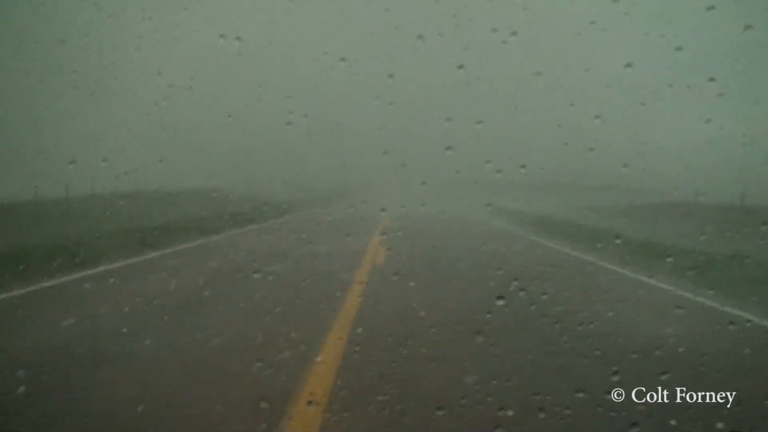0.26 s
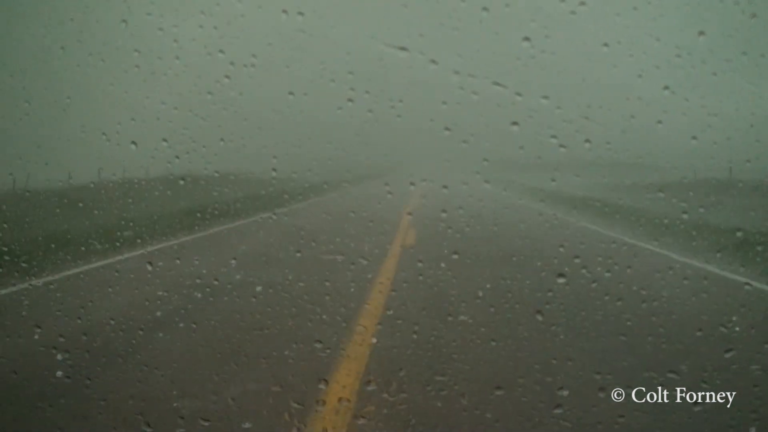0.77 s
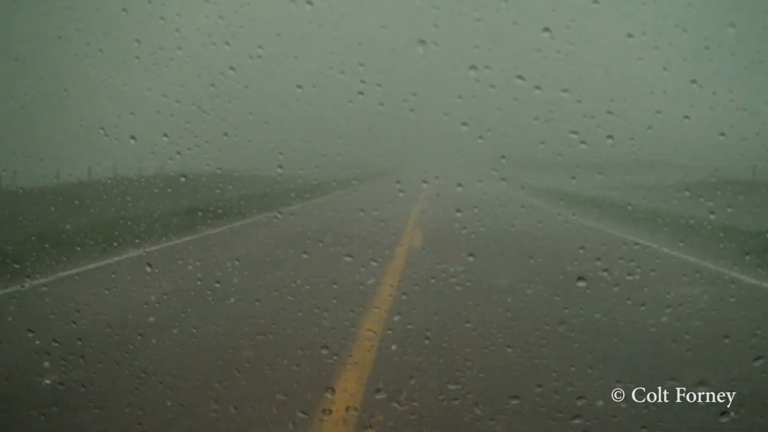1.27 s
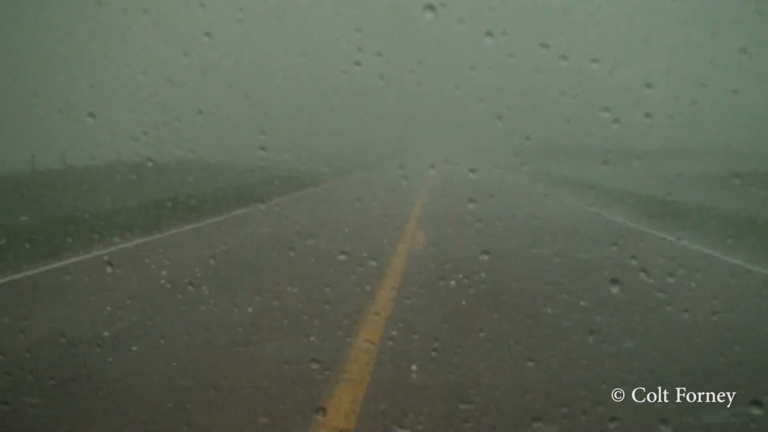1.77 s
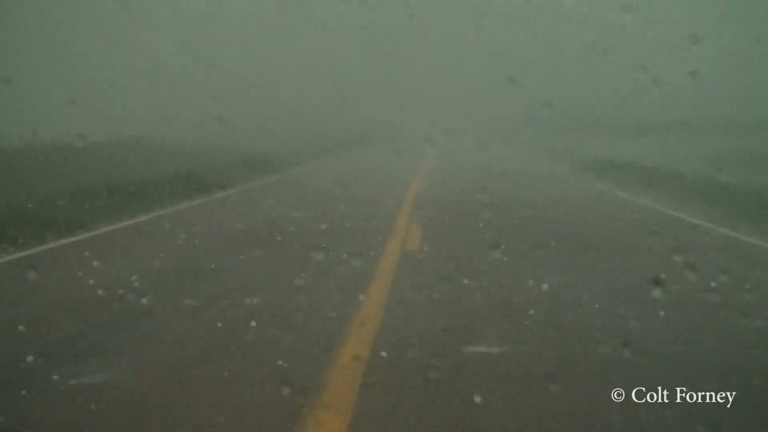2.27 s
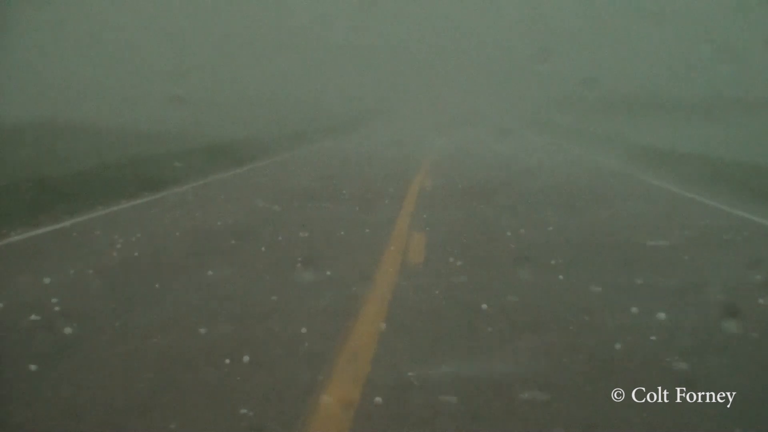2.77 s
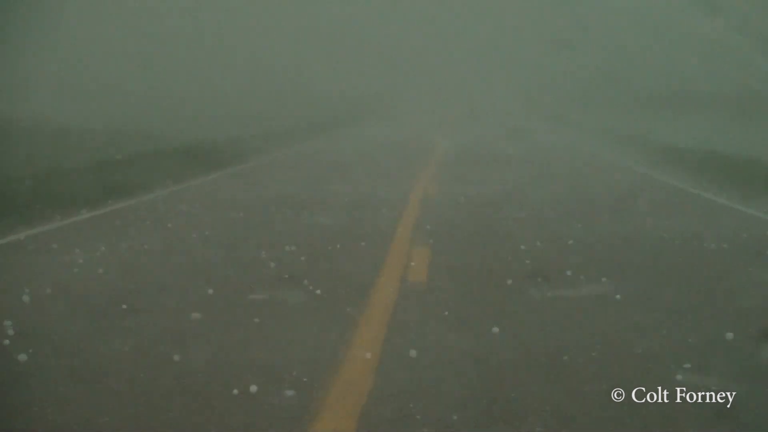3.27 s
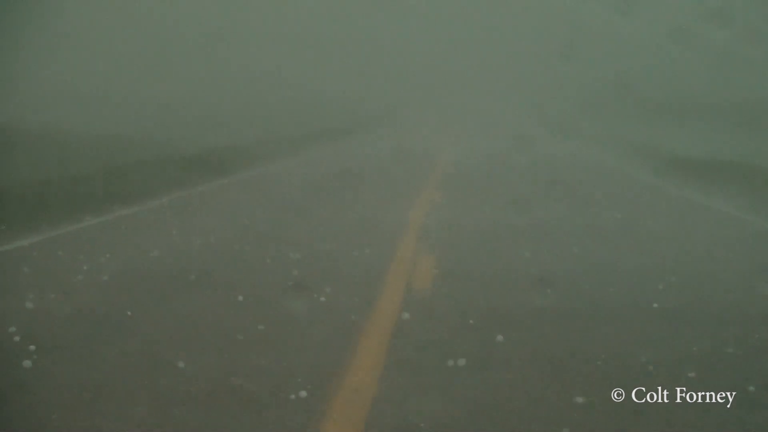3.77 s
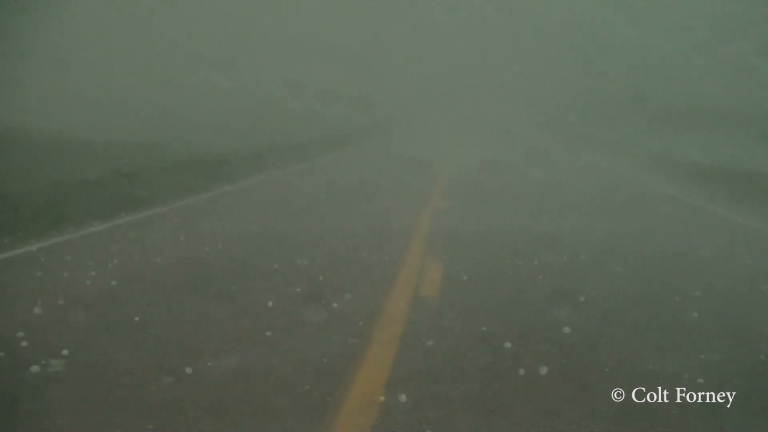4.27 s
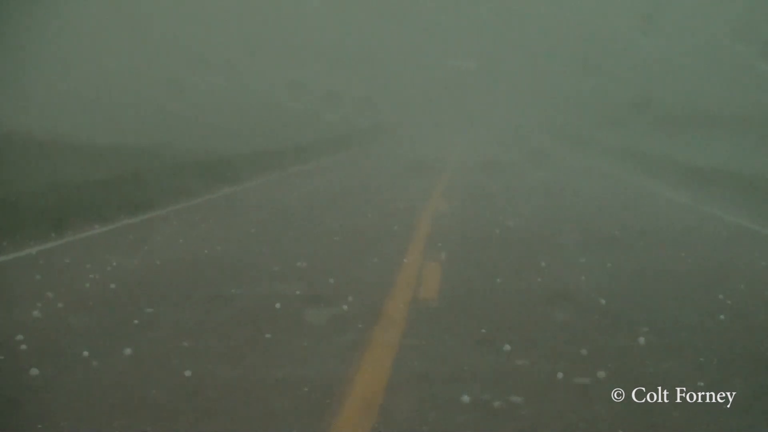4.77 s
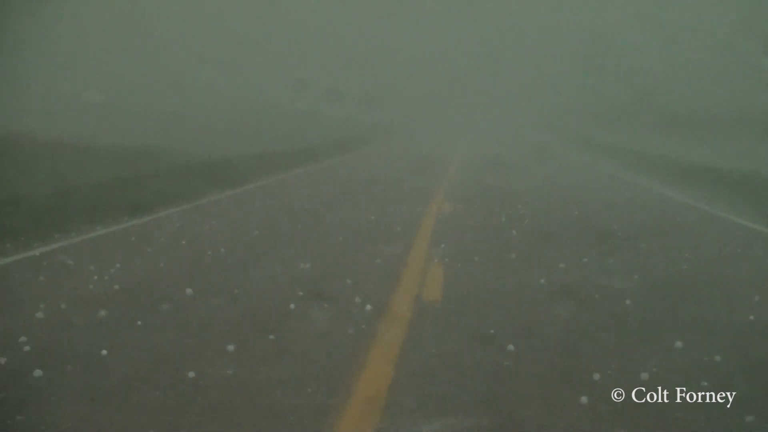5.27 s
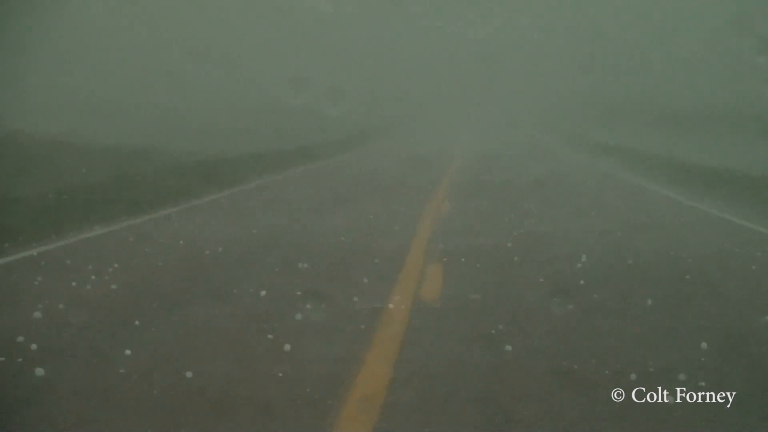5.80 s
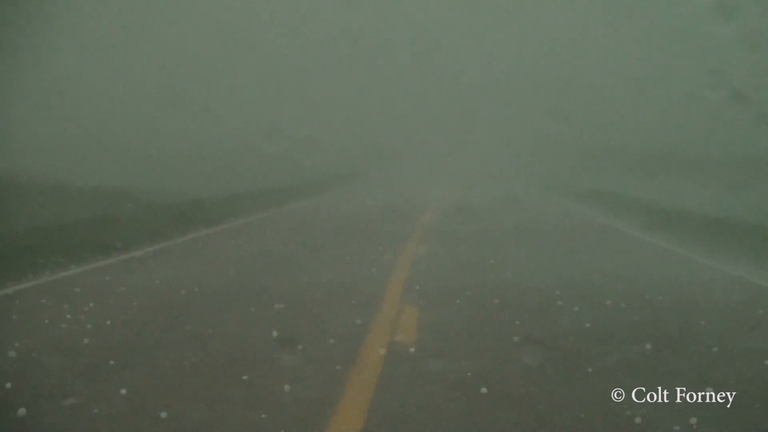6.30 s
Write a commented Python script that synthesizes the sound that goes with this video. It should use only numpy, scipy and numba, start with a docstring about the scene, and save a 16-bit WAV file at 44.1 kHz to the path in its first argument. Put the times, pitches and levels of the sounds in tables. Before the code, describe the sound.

Hailstones clatter irregularly on a car's roof, bonnet and glass, hard knocks and bright icy cracks heard inside the cabin over faint rain.

```python
"""Hailstones strike the roof, bonnet and glass of a car, heard inside the cabin over rain and small pellets.
Each stone rings a dense, new set of damped panel modes; treble dies first, the boom and shell hum last.
Ice shards and skipping fragments add short bright modes; heavy blows flex the roof with a low thump.
Rain is filtered noise. Gain control flattens the loud blows and ducks the patter."""
import sys
import numpy as np
from scipy import signal
from scipy.fft import rfft, irfft, next_fast_len
from scipy.io import wavfile
from scipy.ndimage import uniform_filter1d
from numba import njit

SR = 44100
rng = np.random.default_rng(int(sys.argv[2]) if len(sys.argv) > 2 else 0)


def pcm_store(signal):
    """Save signal as 16-bit PCM."""
    levels = np.round(np.clip(np.atleast_2d(signal), -1, 1) * 32767)
    wavfile.write(sys.argv[1], SR, levels.astype(np.int16).T)


N = 288499
TOP_HZ = 16600  # limit of the panel modes and of the output band

# hailstones: (time [s], strength [dB], panel note [Hz], boom re strength [dB], crack re strength [dB],
# left-right difference [dB], ring length [1 = usual])
HAILSTONES = [(0.136, -16, 1126, -15.5, -8, -2.5, 1.04), (0.282, -7, 950, -38, -25, -1, 0.7),
              (0.458, -9.5, 560, -26.5, -9, 0, 0.87), (0.4622, -19, 4900, -13, 2.5, -2, 0.52),
              (0.519, -7.5, 302, -18.5, -11.5, 5.5, 0.74), (0.592, -34.5, 318, -10, -14, 2.5, 1.3),
              (0.648, -26.5, 350, -28, -21, 4, 1.8), (0.718, -32, 288, -12.5, -7.5, 2, 0.75),
              (0.751, -12, 656, -14.5, -2.5, -5.5, 0.9), (0.826, -12, 575, -12, -13, -4.5, 1.09),
              (1.017, -22.5, 920, -26, 1.5, 3, 0.84), (1.109, -12.5, 177, -16.5, -15, 1.5, 0.63),
              (1.212, -22, 260, -16.5, -15, -1.5, 1.23), (1.286, -28.5, 620, -17, 6.5, 4, 0.47),
              (1.428, -18, 218, -14, -3.5, 4.5, 0.83), (1.668, -8, 306, -22, -8.5, 2.5, 0.75),
              (1.829, -33, 416, -21, -12.5, 0, 1.4), (2.038, -10.5, 306, -22.5, -13, 3.5, 1.34),
              (2.081, -10, 195, -17.5, -6.5, 3.5, 0.89), (2.122, -21, 139, -19, -17.5, -5.5, 1.1),
              (2.19, -17.5, 504, -13, -4.5, 4, 0.69), (2.266, -11.5, 557, -17.5, -18.5, -1.5, 0.94),
              (2.464, -13, 171, -11, -8, -2, 1.11), (2.831, -9.5, 270, -9.5, -16, 0, 0.8),
              (2.848, -9, 283, -17, -10.5, 3, 0.85), (2.901, -14.5, 179, -23, -2.5, 5, 0.67),
              (2.933, -18.5, 520, -17.5, -4.5, 3.5, 0.72), (3.221, -36.5, 570, -27, -5, 1, 1.15),
              (3.509, -19, 600, -19, -4, 2, 0.78), (3.542, -24.5, 3700, -30, 4.5, 0.5, 0.68),
              (3.574, -17.5, 317, -16.5, -10.5, 0.5, 0.57), (3.621, -22.5, 540, -12, -12.5, 0.5, 1.12),
              (3.692, -14, 304, -11.5, -7, 0.5, 1.15), (3.883, -34, 706, -7.5, -16.5, 2.5, 0.81),
              (3.93, -24, 1110, -17.5, -1, -0.5, 0.62), (4.051, -16, 1070, -14.5, 1, -2, 0.83),
              (4.075, -12, 550, -20, -7, 2, 0.82), (4.246, -39.5, 85, -12, -10, 3, 3.7),
              (4.277, -11, 256, -22.5, -2, 3.5, 1.01), (4.3, -14.5, 320, -12, -11.5, -1.5, 0.56),
              (4.474, -46, 1720, -6.5, -18, 4, 1.7), (4.548, -36, 2960, -31, -6, 5, 0.52),
              (4.791, -16, 870, -14, -3, -3.5, 0.61), (4.807, -15, 443, -22.5, -14, 2.5, 1.16),
              (5.057, -29, 286, -7.5, -17.5, 0.5, 1.16), (5.343, -40, 398, -12, -5.5, -2, 1.3),
              (5.349, -25.5, 490, -9, -17, -2.5, 1.13), (5.487, -20, 333, -10.5, -15, 2.0, 0.75),
              (5.655, -18.5, 287, -16.5, -6.5, -0.5, 1.07), (5.759, -19.5, 520, -17.5, -9, -2.5, 1.04),
              (5.822, -22.5, 397, -20, -1.5, 3, 0.74), (5.966, -13, 487, -24.5, -11, -1.5, 0.97),
              (6.007, -31, 315, -33, 10, 3, 0.78), (6.114, -14, 510, -12.5, -11, -2.5, 1.17),
              (6.28, -45, 615, -8.5, -19, -7, 1.55), (6.332, -38, 3400, -29, -4, 5, 0.78),
              (6.417, -36, 312, -20, -15, 3, 0.46), (6.438, -19, 456, -12, -7.5, 1.5, 0.81),
              (6.517, -18.5, 1210, -19, -1.5, 4, 1.06)]
# likeness of left and right: (frequency [Hz], likeness [0-1])
LIKENESS = [(60, .97), (200, .72), (550, .6), (9500, .68), (12000, .99)]


def amp(db):
    """Amplitude ratio of a level in dB."""
    return 10 ** (np.asarray(db) / 20)


def along(points, hz):
    """(Hz, value) points interpolated on a log frequency axis."""
    f, v = np.transpose(points)
    return np.interp(np.log(hz + 1), np.log(f + 1), v)


def filtered(x, response):
    """Multiplies the spectrum of x by a response of frequency, padded against wrap-around."""
    m = next_fast_len(N + 8192)
    return irfft(rfft(x, m) * response(np.fft.rfftfreq(m, 1 / SR)), m)[..., :N]


def spread_rad(hz):
    """Mid-side mixing angle that gives the left-right likeness at each frequency."""
    return np.arccos(np.clip(along(LIKENESS, hz), -1, 1)) / 2


def to_samples(s):
    """Times in seconds as the nearest sample indices."""
    return np.round(s * SR).astype(np.int64)


def mode_step(hz, t60_s):
    """Complex step of one sample: rotation at hz, decay by 60 dB in t60_s."""
    return np.exp((2j * np.pi * hz - np.log(1000) / t60_s) / SR)


@njit
def add(out, start, length, turn, rise, left, right):
    """Adds damped modes; turn is the complex step of one sample, rise the fade-in step."""
    for k in range(len(start)):
        z, gap = 1 + 0j, 1.0
        for i in range(start[k], min(start[k] + length[k], out.shape[1])):
            z *= turn[k]
            gap *= rise[k]
            out[0, i] += (1 - gap) * (z * left[k]).real
            out[1, i] += (1 - gap) * (z * right[k]).real


def panels(blows, rise_s, note_db, count):
    """Rings count damped panel modes per blow, at new pitches and strengths: every stone lands elsewhere."""
    # centres of boom, knock, clank, crack, snap: (frequency [Hz])
    part_centres_hz = [110, 370, 1250, 3600, 8500]
    # panel damping at ring length 1: (frequency [Hz], t60 [s])
    damping = [(50, 0.23), (150, 0.24), (400, 0.14), (1100, 0.11), (3000, 0.089), (9000, 0.058)]
    # colour of the cabin: (frequency [Hz], gain [dB])
    cabin_colour = [(70, -14.5), (120, -2), (490, 4), (3300, 0), (3770, 0), (4200, -1.5), (7500, -1),
                    (12500, -11.5), (16000, -24)]

    blows = np.asarray(blows, float)
    s, note_hz, parts_db, pan_db, ring_length = np.split(blows, [1, 2, 7, 8], axis=1)
    jitter = rng.random((len(blows), count))
    a, b, c, d = np.moveaxis(rng.standard_normal((len(blows), count, 4)), -1, 0)
    hz = 40 + (TOP_HZ - 40) * ((np.arange(count) + jitter) / count) ** 2

    level_db = np.array([along(np.c_[part_centres_hz, p], f) for p, f in zip(parts_db, hz)])
    level_db += note_db * np.exp(-(np.log(hz / note_hz) / 0.13) ** 2)  # the struck panel favours one note
    modes_sharing = count * np.sqrt(hz / TOP_HZ) / 2  # neighbouring modes share the level of a part
    size = amp(level_db + along(cabin_colour, hz)) / np.sqrt(modes_sharing)
    t60_s = np.clip(ring_length * along(damping, hz), .005, 1)
    rise = np.exp(-1 / ((rise_s + 0.42 / hz) * SR))  # low modes build up slower

    angle = spread_rad(hz)
    mid = np.cos(angle) * (a + 1j * b)
    side = np.sin(angle) * (c + 1j * d)
    left = size * amp(pan_db / 2) * (mid + side)
    right = size * amp(-pan_db / 2) * (mid - side)
    out = np.zeros((2, N))
    add(out, to_samples(s).repeat(count), (t60_s * SR).astype(np.int64).ravel(),
        mode_step(hz, t60_s).ravel(), rise.ravel(), left.ravel(), right.ravel())
    return out


def rain_db(s):
    """Patter and hiss levels at time s."""
    # rain: (time [s], patter on the body [dB], hiss on the glass [dB])
    rain_levels = [(0, -57.5, -68.5), (1, -58.5, -65.5), (2.35, -53.5, -62.5), (2.75, -60.5, -73.5),
                   (3.3, -63.5, -66.5), (3.85, -55.5, -64.5), (4.65, -60.5, -67), (5.2, -63, -75.5),
                   (5.9, -61, -73), (6.54, -58, -64)]
    when, *levels = np.transpose(rain_levels)
    return [np.interp(s, when, db) for db in levels]


def rain():
    """Drops patter on the body and hiss on the glass, over a low road rumble: flickering noise in three bands."""
    # spectral slope of rain and road: (frequency [Hz], relative density [dB per Hz])
    slope = [(50, 14.5), (500, 2.5), (3800, -15.5), (10000, -33.5), (12500, -37), (14500, -50)]
    # edges of rumble, patter, hiss: (frequency [Hz])
    band_edges_hz = [1, 350, 4700, SR]

    z = signal.stft(rng.standard_normal((2, N)), nperseg=256)[2]
    flicker = uniform_filter1d(rng.standard_normal(z.shape[1:]), size=30, axis=0)
    flicker = uniform_filter1d(flicker, size=5, axis=1)
    flicker_db = 2 * flicker / flicker.std()
    noise = signal.istft(z * amp(flicker_db), nperseg=256)[1][:, :N]

    patter_db, hiss_db = rain_db(np.arange(N) / SR)
    out = np.zeros((2, N))
    for low_hz, high_hz, db in zip(band_edges_hz, band_edges_hz[1:], [-58, patter_db, hiss_db]):
        def mid_side_response(hz):
            low_pass = 1 / (1 + (hz / high_hz) ** 4)
            high_pass = 1 / (1 + (low_hz / (hz + 1)) ** 4)
            angle = spread_rad(hz)
            return amp(along(slope, hz)) * low_pass * high_pass * np.array([np.cos(angle), np.sin(angle)])
        mid, side = filtered(noise, mid_side_response)
        out += amp(db) * np.array([mid + side, mid - side]) / np.hypot(mid.std(), side.std())
    return out * amp([[1.2], [-1.2]])  # slightly left


def pellets(count=420):
    """Small stones and big drops: short ticks of panel modes, each on its own glass note; most barely top the rain."""
    # pellets heard singly: (time [s], level [dB], knock re level [dB])
    single_pellets = [(.076, -64.5, 25), (.251, -44, 3), (1.182, -41, 3), (1.965, -37.5, -19),
                      (2.544, -35.5, -18), (2.629, -43.5, 8), (2.71, -50, 4), (3.068, -40.5, 1),
                      (3.345, -47, -8), (3.982, -38, -15), (4.162, -33.5, -11), (4.224, -38, -13),
                      (4.356, -43, 11), (4.508, -40, -8), (5.129, -56, 16), (5.458, -47, -5),
                      (5.558, -45.5, 9), (6.176, -39.5, 8), (6.215, -49, 5), (6.498, -31.5, -5)]

    when, size, tilt, side, note = rng.random((count, 5)).T
    s = when * N / SR
    patter_db, hiss_db = rain_db(s) + 9 * size ** 2
    dull_db = 14 * (tilt - .5)
    low_db = patter_db - 15.5 + dull_db
    many = np.c_[s, 1500 + 4000 * note, low_db, low_db, low_db, patter_db - 5, hiss_db + 4 - dull_db,
                 10 * side - 2, .1 + .7 * size]

    s, db, knock_db = np.transpose(single_pellets)
    side, note = rng.random((len(s), 2)).T
    low_db = db + knock_db - 8
    single = np.c_[s, 3000 + 1400 * note, low_db - 12, low_db, low_db - 1.5, db - 4, db - 3.5,
                   6 * side, np.full(len(s), .75)]
    return panels(np.vstack([many, single]), rise_s=0.00027, note_db=3, count=100)


def stone_rows():
    """Blow rows for panels(): five part levels per stone from its strength, boom and crack."""
    # boom, knock, clank, crack, snap of every stone: (level re strength [dB])
    part_offsets_db = [7.5, -1, -6, 3.5, 6]
    # how far each part follows the boom column: (factor [dB per dB])
    boom_reach = [1, 0.46, -0.06, 0.21, 0.094]
    # how far each part follows the crack column: (factor [dB per dB])
    crack_reach = [0.12, 0, 0.051, 0.9, 1.145]

    s, db, note_hz, boom_db, crack_db, pan_db, ring_length = np.array(HAILSTONES, float).T[..., None]
    parts_db = db + part_offsets_db + boom_db * boom_reach + crack_db * crack_reach
    return np.hstack([s, note_hz, parts_db, pan_db, ring_length])


def stones():
    """Each hailstone excites a dense set of damped modes in the panel it strikes."""
    return panels(stone_rows(), rise_s=0.0031, note_db=7.0, count=330)


def shell_hum():
    """Every stone hums the whole shell on the same low modes, each as its (random) landing spot allows."""
    # shell modes: (nominal frequency [Hz], level re boom [dB], t60 [s])
    shell_modes = [(123.7, -18.5, 0.56), (208.2, -22, 0.52), (286.5, -17.5, 0.34), (474, -4.5, 0.18)]

    rows = stone_rows()
    hz, db, t60_s = np.transpose(shell_modes)
    a, b, c = np.moveaxis(rng.standard_normal((len(rows), len(hz), 3)), -1, 0)
    boom_db = rows[:, [2]]
    size = (amp(boom_db + db) * amp(3 * a) * np.exp(2j * b)).ravel()  # random level and phase
    detuned_hz = hz * (1 + 0.017 * c)
    out = np.zeros((2, N))
    add(out, to_samples(rows[:, 0]).repeat(len(hz)), np.tile(t60_s * SR, len(rows)).astype(np.int64),
        mode_step(detuned_hz, t60_s).ravel(), np.tile(np.exp(-hz / (1.5 * SR)), len(rows)), size, size)
    return out


def shards():
    """Shattering ice: a dry, bright crack follows each blow; the higher its crack, the sooner, louder, shorter."""
    rows = stone_rows()
    late, size = rng.random((len(rows), 2)).T
    crack_db = np.array(HAILSTONES)[:, 4]
    soft = np.clip(0.5 - 0.06 * crack_db, 0, 1)
    rows[:, 0] += 0.0049 * late * soft
    rows[:, 2:7] += np.array([-36, -6.0, -21, 8.0, -4.0]) + (8 * size - 6 * soft)[:, None]
    rows[:, 8] = 0.16 + 0.24 * soft
    return panels(rows, rise_s=0.00066, note_db=10.5, count=100)


def fragments(count=3):
    """Pieces of each stone skip and land again within moments: thin clicks that roughen the blow."""
    skip_s, skip_loss_db = 0.022, 12  # latest landing, and the loss by then
    rows = stone_rows().repeat(count, axis=0)
    late, size = rng.random((len(rows), 2)).T
    rows[:, 0] += skip_s * late
    rows[:, 2:7] += np.array([-40, -11, -1.5, 4.5, 0]) - (skip_loss_db * late + 8 * size)[:, None]
    rows[:, 8] = 0.078
    return panels(rows, rise_s=0.00019, note_db=7, count=60)


def thumps():
    """Under heavy blows the roof gives way and swings back a few times: one damped low mode, slow to start."""
    # roof thumps: (time [s], pitch [Hz], level before the common offset [dB])
    roof_thumps = [(0.523, 66.4, -31), (1.428, 62, -50), (1.669, 59.5, -38), (2.04, 54, -37),
                   (2.085, 73.6, -38), (2.464, 80, -34), (3.508, 66.4, -47.5), (3.691, 118, -46),
                   (4.27, 66.6, -42), (5.351, 165, -37.5), (5.759, 60, -49), (6.42, 70.4, -55)]
    rise_s, t60_s, offset_db = 0.014, .16, 20

    s, hz, db = np.transpose(roof_thumps)
    size = -1j * amp(db + offset_db)  # starts at zero displacement
    out = np.zeros((2, N))
    add(out, to_samples(s), np.full(len(s), int(t60_s * SR)), mode_step(hz, t60_s),
        np.full(len(s), np.exp(-1 / (rise_s * SR))), size, size)
    return out


def scene():
    """Rain, pellets, stones, shell hum, shards, fragments and roof thumps sum at both microphone ports."""
    return rain() + pellets() + stones() + shell_hum() + shards() + fragments() + thumps()


@njit
def follow(level, attack, release):
    """A peak detector that charges fast and drains slowly."""
    out, held = np.empty_like(level), 0.0
    for i in range(len(level)):
        held += (attack if level[i] > held else release) * (level[i] - held)
        out[i] = held
    return out


def record(dry):
    """Gain control turns down what passes the knee, the input stage rounds peaks off, a band limit cuts the top."""
    attack_s, release_s, knee_db, clip = .0005, 0.031, -17, .42
    held = follow(np.abs(dry).max(axis=0), 1 / (attack_s * SR), 1 / (release_s * SR))
    gain = (1 + (held / amp(knee_db)) ** 2) ** -.3
    levelled = dry * gain
    rounded = levelled / (1 + (levelled / clip) ** 4) ** (1 / 4)
    return filtered(rounded, lambda hz: hz < TOP_HZ)


dry = scene()
out = record(dry)
pcm_store(out)
```